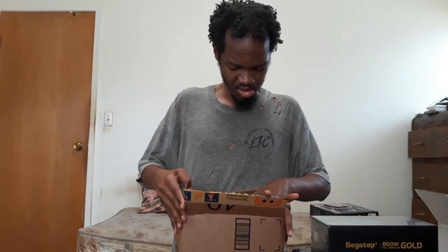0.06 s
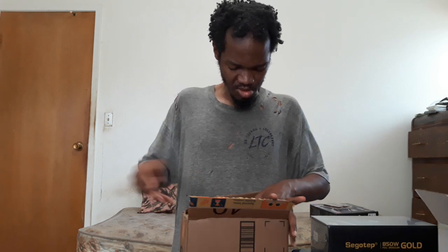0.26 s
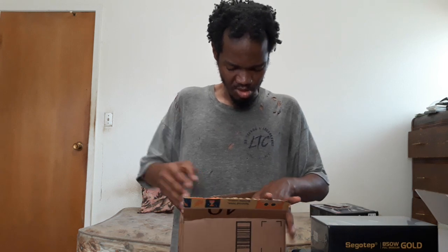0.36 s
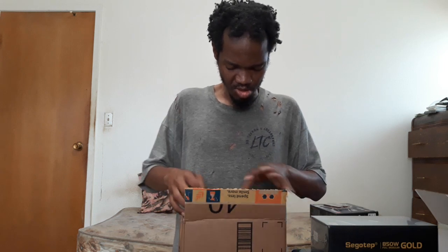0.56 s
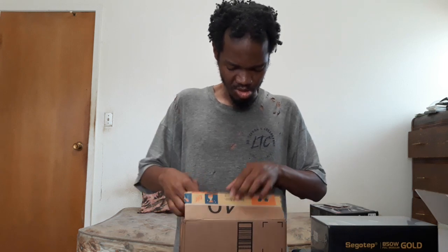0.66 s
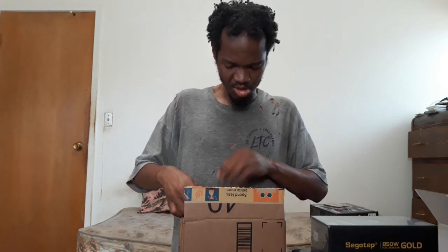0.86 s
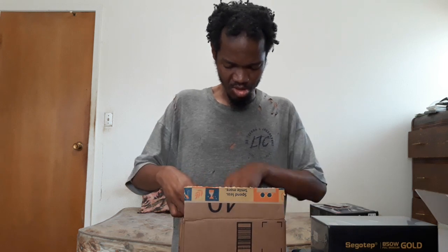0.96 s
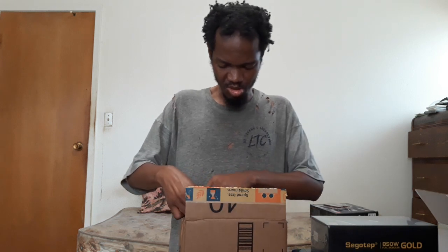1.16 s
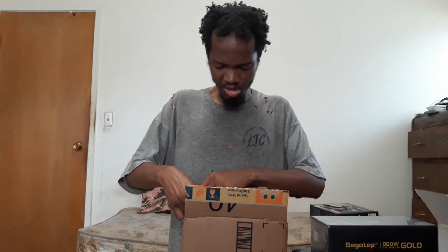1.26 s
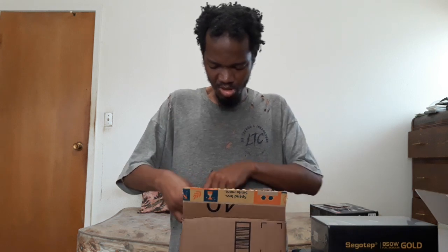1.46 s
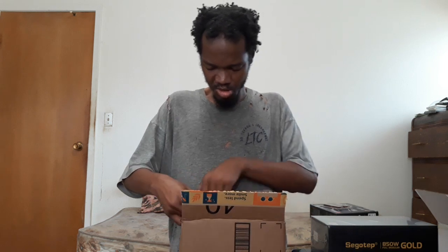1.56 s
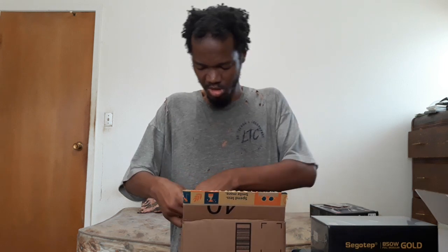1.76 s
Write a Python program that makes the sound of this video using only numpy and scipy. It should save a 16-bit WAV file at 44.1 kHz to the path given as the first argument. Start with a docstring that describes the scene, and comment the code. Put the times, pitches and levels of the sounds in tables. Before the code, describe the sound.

A cardboard box is opened by hand: a flap snaps loudly, board scrapes, hollow knocks and a second weaker snap follow, then quieter rubbing. Close stereo microphones in a small, bare, quiet room.

```python
"""Opening a cardboard box

A cardboard box is opened by hand in a small, bare room, a step from the microphones.
A flap tears free with a loud snap, a second one is folded back: bursts of grit over ringing box modes.
Fingers knock on the hollow box (damped tones) and creases tick (short clicks).
Board slides over board in gritty strokes (shaped noise) that squeak now and then (narrow noise bands)."""
import sys
import numpy as np
from scipy import signal
from scipy.fft import rfft, irfft, next_fast_len
from scipy.io import wavfile
from scipy.ndimage import map_coordinates

SR = 44100
rng = np.random.default_rng(int(sys.argv[2]) if len(sys.argv) > 2 else 0)


def persist_wave(psi):
    """Save psi, clipped to +-1, as 16-bit WAV."""
    counts = np.round(np.clip(psi, -1, 1) * 32767).astype(np.int16)
    wavfile.write(sys.argv[1], SR, np.atleast_2d(counts).T)


N = 79380

# spectra, each scaled to rms 1 in use: f/Hz, relative density/dB
# air thump of the box
THUMP_SPECTRUM = [(20, -37), (45, -20), (70, -12.5), (95, 2.5), (135, 3.5), (200, -3), (400, -20),
                  (1000, -80)]
# drone and rattle of the board
BOARD_SPECTRUM = [(40, -19.5), (95, -8.5), (180, -8.5), (300, -2), (480, -0.5), (850, -3.5), (1050, -5),
                  (1300, -5.5), (1500, -8), (1750, -14.5), (3500, -47.5)]
# finest fibre noise
HISS_SPECTRUM = [(4000, -53), (7000, -5), (8500, -9), (10500, -1.5), (12000, 4), (15000, 0)]
# left-right correlation of the room's field: f/Hz, correlation
ROOM_CORRELATION = [(100, 0.94), (300, 0.89), (600, 0.56), (1200, 0.11), (8000, 0)]


def amp(db):
    """Decibels to gain."""
    return 10 ** (np.asarray(db) / 20)


def unit(x):
    """Scale to rms 1."""
    return x / np.sqrt(np.mean(x ** 2) + 1e-20)


def along(points, hz):
    """Interpolate (f/Hz, value) points on a log frequency axis."""
    f, v = np.transpose(points)
    return np.interp(np.log(hz + 1), np.log(f + 1), v)


def filtered(x, response):
    """Multiply the spectrum of x by response(hz)."""
    n = x.shape[-1]
    m = next_fast_len(n + SR // 4)  # padded against wrap-around
    hz = np.fft.rfftfreq(m, 1 / SR)
    return irfft(rfft(x, m) * response(hz), m)[..., :n]


def coloured(x, spectrum):
    """Shape x by a spectrum, at rms 1."""
    return unit(filtered(x, lambda hz: amp(along(spectrum, hz))))


def noise(spectrum):
    """Gaussian noise with a spectrum, at rms 1."""
    return coloured(rng.standard_normal(N), spectrum)


def grit(spectrum):
    """Fibres slipping: dense clicks of uneven size over a smooth rub."""
    slips_per_s, size_spread_db, smooth_gain = 1800, 5, 0.37
    hits = rng.random(N) < slips_per_s / SR
    signs = rng.choice([-1, 1], N)
    sizes = amp(size_spread_db * rng.standard_normal(N))
    rub = smooth_gain * rng.standard_normal(N)
    return coloured(unit(hits * signs * sizes) + rub, spectrum)


def since(start_s):
    """Seconds after start_s, zero before."""
    return np.maximum(np.arange(N) / SR - start_s, 0)


def blow(start_s, rise_s, t60_s):
    """Envelope of an impact: rise with time constant rise_s, exponential fall."""
    t = since(start_s)
    return (1 - np.exp(-t / rise_s)) * np.exp(-np.log(1000) * t / t60_s)


def ear_angle(hz):
    """Angle whose cosine is the left-right correlation."""
    return np.arccos(np.clip(along(ROOM_CORRELATION, hz), -1, 1))


def spread(pair):
    """Mix two unrelated signals into a diffuse field: mid and side weights set the correlation."""
    def weights(hz):
        half = ear_angle(hz) / 2
        return np.array([np.cos(half), np.sin(half)])
    mid, side = filtered(pair, weights)
    return np.array([mid + side, mid - side])


def room(x):
    """Reverberation: diffuse noise tail, each frequency decaying at its own rate."""
    # decay of the room: f/Hz, t60/s
    room_t60 = [(100, 0.38), (300, 0.26), (1000, 0.31), (4000, 0.34), (13000, 0.44)]
    build_s = 0.002
    hz, t, z = signal.stft(rng.standard_normal((2, SR // 2)), SR, nperseg=256)
    decay = np.exp(-np.log(1000) * t / along(room_t60, hz)[:, None])
    tail = spread(signal.istft(z * decay, SR)[1])
    tail *= 1 - np.exp(-np.arange(tail.shape[1]) / SR / build_s)
    return signal.fftconvolve(x[None], tail / np.linalg.norm(tail[0]), axes=1)[:, :N]


def placed(x, reflected_db=0):
    """Direct sound, first reflections that differ at each microphone, and the room."""
    direct_db, near_wall_db, room_db = -4.5, -3.5, -2.5
    latest_s = 0.006  # of the first reflections
    near = np.zeros((2, SR // 20))
    for taps in near:
        lags = rng.uniform(0.05, 1, size=8) * latest_s * SR
        lags = np.clip(lags, 1, len(taps) - 1).astype(int)
        taps[lags] = rng.choice([-1, 1], len(lags)) / np.sqrt(len(lags))
    early = signal.fftconvolve(x[None], spread(near), axes=1)[:, :N]
    reflected = amp(near_wall_db) * early + amp(room_db) * room(x)
    return amp(direct_db) * x + amp(reflected_db) * reflected


def snaps():
    """A burst of breaking fibres shakes the panel and leaves the box ringing."""
    # flaps snapping: t/s, then thump, board, crack, sizzle, ring level/dB, crack t60/s
    flap_snaps = [(0.2008, -32, -19, -13.5, -30, -24.5, 0.16), (0.731, -37, -27.5, -22, -42, -47, 0.048)]
    # box ringing in the room: f/Hz, level re ring/dB, t60/s
    box_modes = [(323.4, 2, 0.23), (964, 6, 0.19), (1340, -11, 0.27), (1523, -3, 0.33), (2470, -5, 0.12),
                 (2776, 2, 0.15), (2975, 9, 0.12), (3060, 3, 0.1), (3480, 2, 0.12)]
    # spectra: f/Hz, relative density/dB
    panel_spectrum = [(80, -57), (170, -7), (280, -0.5), (480, -6.5), (650, -4.5), (950, -3.5), (1450, -2),
                      (1750, -17.5), (3500, -38)]
    crack_spectrum = [(700, -15.5), (1600, -20.5), (2000, -2), (2250, -10), (2850, 2), (3700, -6),
                      (5000, -12), (6800, -17), (8000, -47), (12000, -71)]
    crack_rise_s, panel_rise_s, ring_rise_s = 0.00071, 0.01, 0.0054
    panel_t60_ratio = 1.65  # panel moves for longer than the crack
    out = np.zeros((2, N))
    for s, thump_db, board_db, crack_db, sizzle_db, ring_db, t60_s in flap_snaps:
        fibres = amp(crack_db) * grit(crack_spectrum) + amp(sizzle_db) * grit(HISS_SPECTRUM)
        crack = blow(s, crack_rise_s, t60_s) * fibres
        body = amp(board_db) * grit(panel_spectrum) + amp(thump_db) * noise(THUMP_SPECTRUM)
        panel = blow(s, panel_rise_s, panel_t60_ratio * t60_s) * body
        out += placed(crack + panel)
        for hz, mode_db, mode_t60_s in box_modes:
            phase = ear_angle(hz) * np.array([[0.5], [-0.5]])  # left, right
            tone = np.sin(2 * np.pi * hz * since(s) + phase)
            out += amp(ring_db + mode_db) * blow(s, ring_rise_s, mode_t60_s) * tone
    return out


def knocks():
    """Soft blows: one damped panel tone, a short rattle of board and a thump of the enclosed air."""
    # fingers and flaps on the box: t/s, tone level/dB, panel f/Hz, t60/s, rattle level/dB, thump level/dB
    box_knocks = [(0.0596, -27.5, 408, 0.014, -35, -64), (.251, -25, 339, 0.045, -22.5, -31),
                  (.317, -37, 348, 0.035, -40, -36.5), (.706, -40, 285, 0.21, -44, -35),
                  (0.7337, -18.5, 345, 0.049, -29, -56), (.745, -32, 279, 0.15, -31.5, -55),
                  (0.885, -38, 415.5, 0.25, -43, -48), (.891, -23, 448, 0.036, -29.5, -64),
                  (1.054, -29, 327.9, 0.27, -40, -42), (1.087, -25.5, 331, 0.057, -40, -50),
                  (1.146, -31, 223, 0.064, -36, -58), (1.468, -42.5, 212, 0.13, -52, -67)]
    rise_s, thump_t60_s, tone_room_db = 0.00085, 0.054, -11.5
    tones, thuds = np.zeros(N), np.zeros(N)
    for s, tone_db, hz, t60_s, rattle_db, thump_db in box_knocks:
        swing = blow(s, rise_s, t60_s)
        tones += amp(tone_db) * swing * np.sin(2 * np.pi * hz * since(s))
        thuds += amp(rattle_db) * swing * noise(BOARD_SPECTRUM)
        thuds += amp(thump_db) * blow(s, rise_s, thump_t60_s) * noise(THUMP_SPECTRUM)
    return tones + amp(tone_room_db) * room(tones) + placed(thuds)


def ticks():
    """Single creases give way, each a click with a brief ring at its own pitch."""
    # creases: t/s, level/dB, ring f/Hz
    crease_ticks = [(0.0568, -28.5, 3000), (0.2014, -16, 2880), (0.3233, -26, 3170), (0.7336, -27, 2930),
                    (0.742, -19, 1240), (0.8913, -22.5, 1250), (1.1502, -25.5, 1200), (1.1678, -19, 4260),
                    (1.1758, -26.5, 6200), (1.4844, -30, 2650)]
    # click spectrum: f/Hz, relative density/dB
    click_spectrum = [(300, -31), (800, 11.5), (1600, 1), (2800, 9.5), (4200, -7), (5200, -11), (6700, -14),
                      (8000, -37), (16000, -32)]
    rise_s, t60_s, ring_db, reflected_db = 0.00031, 0.0072, -4.5, -4
    envelope, ring = np.zeros(N), np.zeros(N)
    for s, db, hz in crease_ticks:
        pulse = amp(db) * blow(s, rise_s, t60_s)
        envelope += pulse
        ring += pulse * np.sin(2 * np.pi * hz * since(s))
    return placed(envelope * noise(click_spectrum) + amp(ring_db) * ring, reflected_db)


def flutter():
    """Uneven pressure of a sliding hand, as a smooth random gain."""
    depth_db, knots_per_s = 2, 60
    knots = since(0) * knots_per_s
    return amp(depth_db * map_coordinates(rng.standard_normal(size=512), [knots], mode="wrap"))


def strokes():
    """Hands and flaps slide: the board drones under a gritty scrape and a fine hiss."""
    # one table per stroke: t/s, then board, scrape, hiss level/dB
    grip = [(0, -45, -57, -68), (.045, -52.5, -58.5, -90), (.075, -45, -52.5, -79), (.13, -48.5, -57, -82),
            (.2, -43, -48, -61)]
    lift = [(0.259, -37.5, -39, -69), (.39, -44, -51, -73), (.47, -53.5, -57, -63.5),
            (0.514, -56, -54.5, -74), (0.549, -43, -41, -53.5), (0.58, -41, -54.5, -67),
            (.605, -80, -75, -88), (.65, -62, -79, -86)]
    fold = [(.655, -56.5, -58, -75), (0.684, -47, -45, -56), (0.727, -36, -44, -53),
            (.762, -34.5, -41.5, -63), (.8, -66, -87, -80), (.87, -68, -58, -86), (0.921, -49, -58, -74),
            (.95, -70, -84, -80)]
    press = [(1.057, -43.5, -48.5, -78), (1.125, -44, -54, -79), (1.151, -36.5, -50, -72),
             (1.18, -36, -41, -53.5), (1.215, -51, -52, -64), (1.27, -56, -67.5, -63.5)]
    reach = [(1.276, -53.5, -59, -75), (1.301, -46, -47.5, -63), (1.37, -50, -56, -64),
             (1.46, -51.5, -57, -79), (1.55, -46.5, -48, -63), (1.654, -54.5, -51.5, -66.5),
             (1.687, -39.5, -44, -59), (1.8, -48.5, -48.5, -62)]
    # scrape spectrum: f/Hz, relative density/dB
    scrape_spectrum = [(700, -46), (1600, -6.5), (2450, 2.5), (3300, -3), (4300, -1.5), (5200, -5.5),
                       (6700, -8.5), (8000, -26.5), (12000, -81)]
    edge_s = 0.013  # fade at either end
    out, t = np.zeros((2, N)), since(0)
    for stroke in (grip, lift, fold, press, reach):
        s, *levels = np.transpose(stroke)
        contact = np.interp(t, [s[0] - edge_s, s[0], s[-1], s[-1] + edge_s], [0, 1, 1, 0])
        rubbing = np.zeros(N)
        for db, spectrum in zip(levels, (BOARD_SPECTRUM, scrape_spectrum, HISS_SPECTRUM)):
            rubbing += amp(np.interp(t, s, db)) * grit(spectrum)
        out += placed(flutter() * contact * rubbing)
    return out


def squeaks():
    """Edges catch and slip at a nearly steady rate: narrow noise bands."""
    # stick-slip: start/s, rise/s, hold/s, release/s, centre f/Hz, width at half amplitude/Hz, level/dB
    stick_slips = [(.513, 0.0039, 0.015, 0.018, 615, 320, -34),
                   (.512, 0.0048, 0.025, 0.017, 1070, 220, -44),
                   (0.65, 0.018, 0.002, 0.0046, 2450, 280, -48),
                   (0.511, 0.015, 0.024, 0.042, 2300, 470, -47.5),
                   (.704, .03, 0.0047, 0.015, 553, 45, -30.5),
                   (1.053, 0.0073, 0.013, 0.032, 1100, 70, -43.5),
                   (1.162, 0.0081, 0.015, 0.039, 4250, 430, -45), (1.477, 0.2, 0.068, .2, 4230, 290, -47)]
    out, t = np.zeros(N), since(0)
    for s, rise_s, hold_s, release_s, hz, width_hz, db in stick_slips:
        def resonance(f):
            return 1 / (1 + ((f - hz) / width_hz * 2) ** 2)
        tone = unit(filtered(rng.standard_normal(N), resonance))
        corners_s = s + np.cumsum([0, rise_s, hold_s, release_s])
        out += amp(db) * tone * np.interp(t, corners_s, [0, 1, 1, 0])
    return placed(out)


def background():
    """Steady noise floor, spread as a diffuse field."""
    # floor spectrum: f/Hz, relative density/dB
    floor_spectrum = [(20, 9), (60, -22), (130, -7.5), (500, 0.5), (1500, -10), (5000, -11.5),
                      (8000, -31.5), (16000, -23)]
    level_db = -59.5
    return amp(level_db) * spread(np.array([noise(floor_spectrum), noise(floor_spectrum)]))


def scene():
    """The box in its quiet room."""
    return snaps() + knocks() + ticks() + strokes() + squeaks() + background()


def record(dry):
    """Microphone pair: right one brighter, deepest bass rolled off, nothing above the band limit."""
    # channel balance: f/Hz, left minus right/dB
    balance = [(100, 0), (700, 0.5), (2200, 0), (4500, -3), (8000, -7), (14000, -1)]
    low_cut_hz, top_hz = 71, 15900

    def response(hz):
        low_cut = hz ** 2 / np.sqrt(hz ** 4 + low_cut_hz ** 4)
        tilt = amp(along(balance, hz) * np.array([[0.5], [-0.5]]))
        return tilt * low_cut * (hz < top_hz)
    return filtered(dry, response)


dry = scene()
out = record(dry)
persist_wave(out)
```